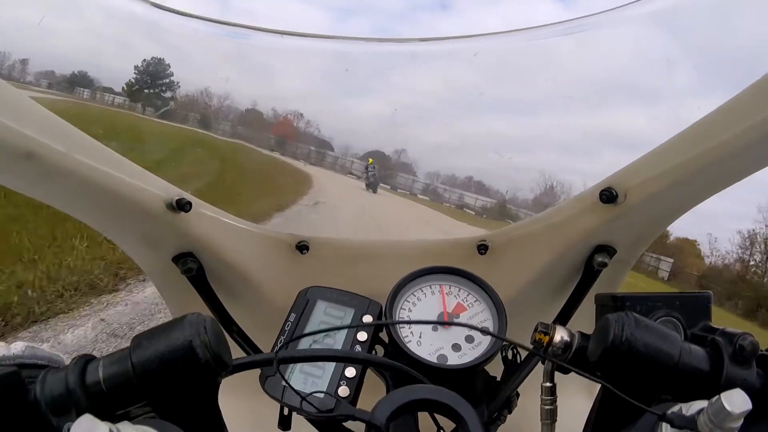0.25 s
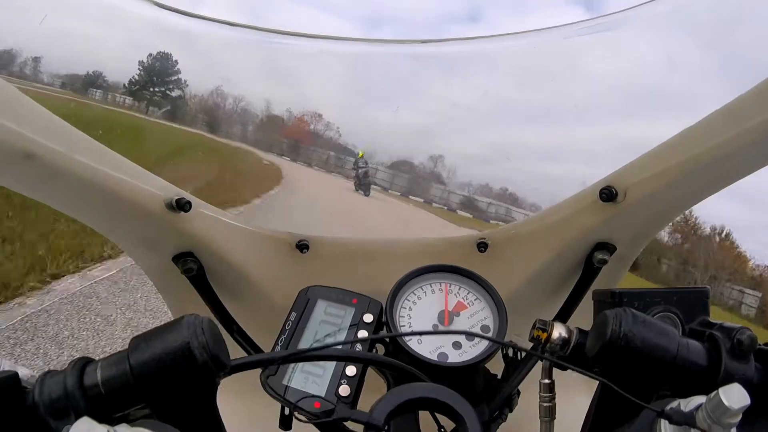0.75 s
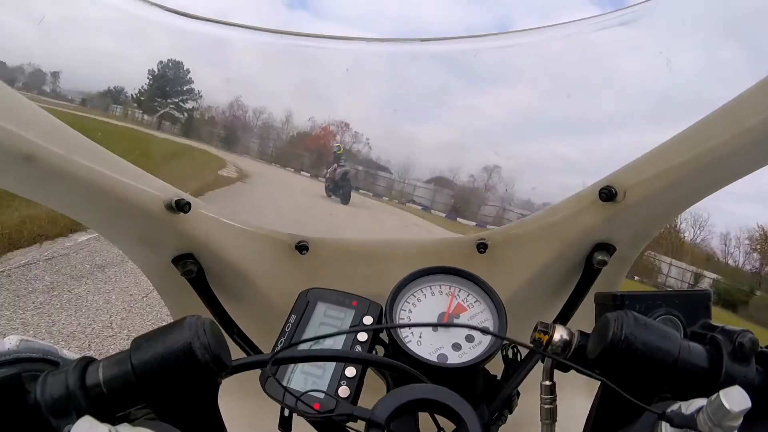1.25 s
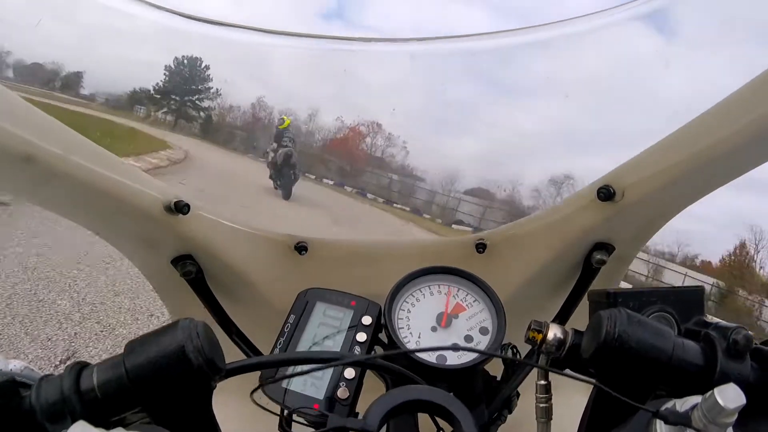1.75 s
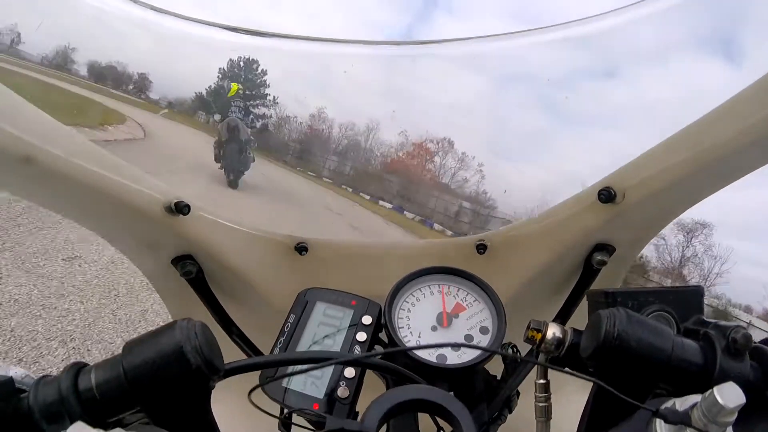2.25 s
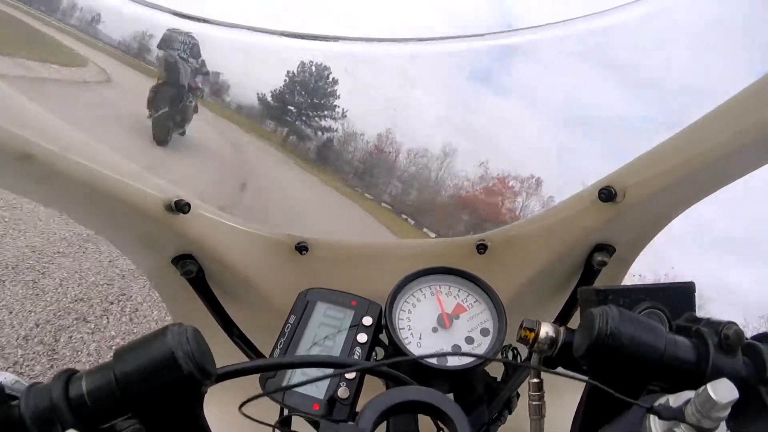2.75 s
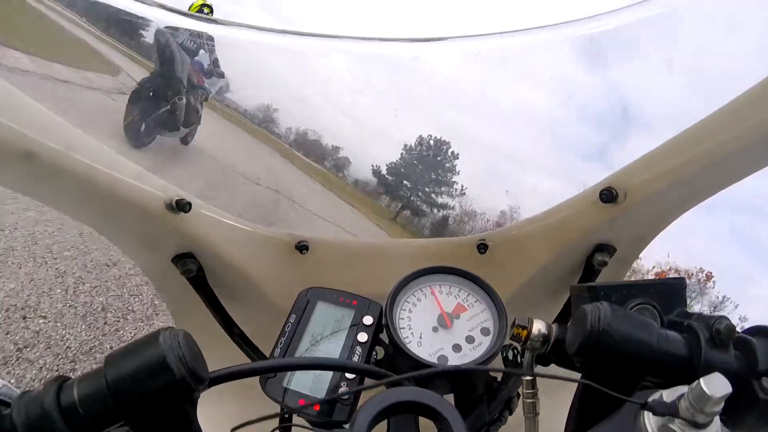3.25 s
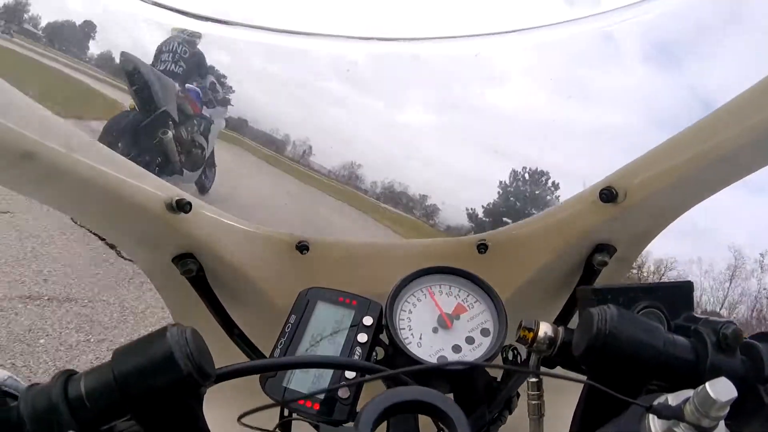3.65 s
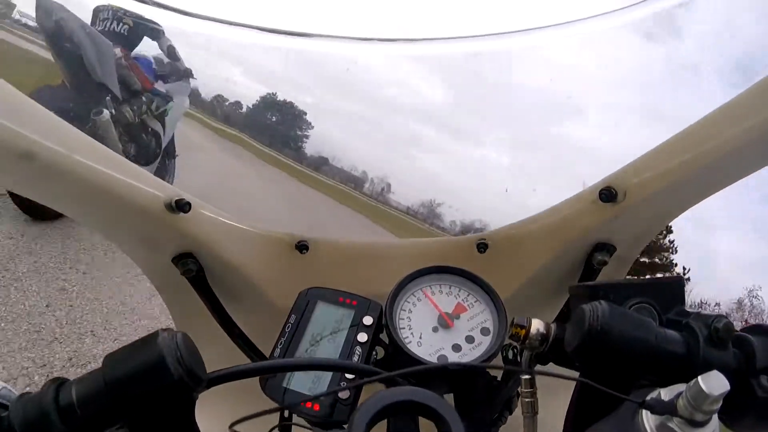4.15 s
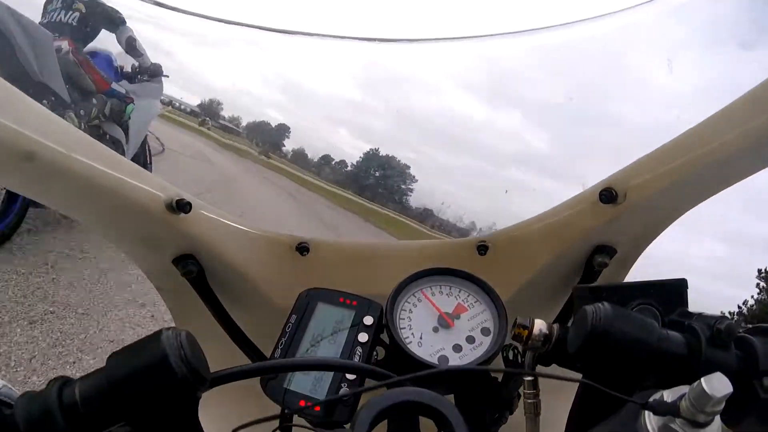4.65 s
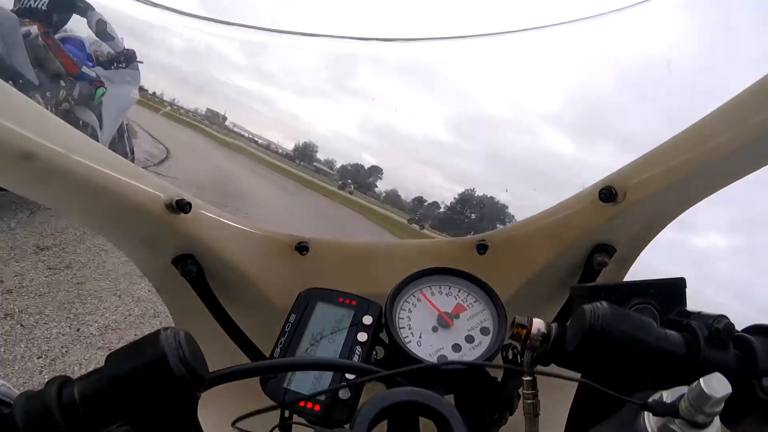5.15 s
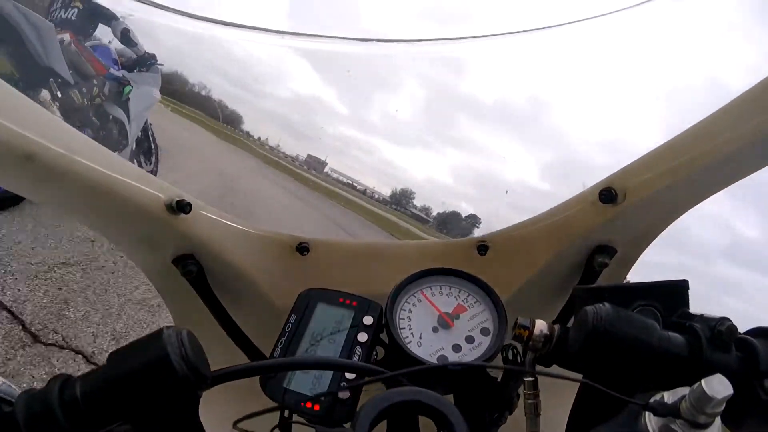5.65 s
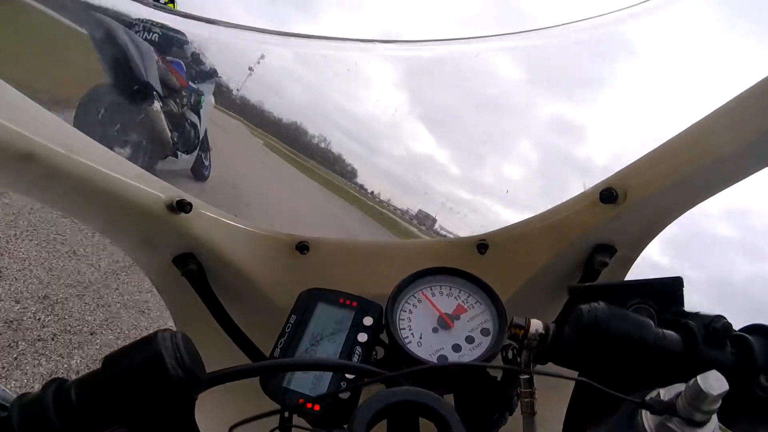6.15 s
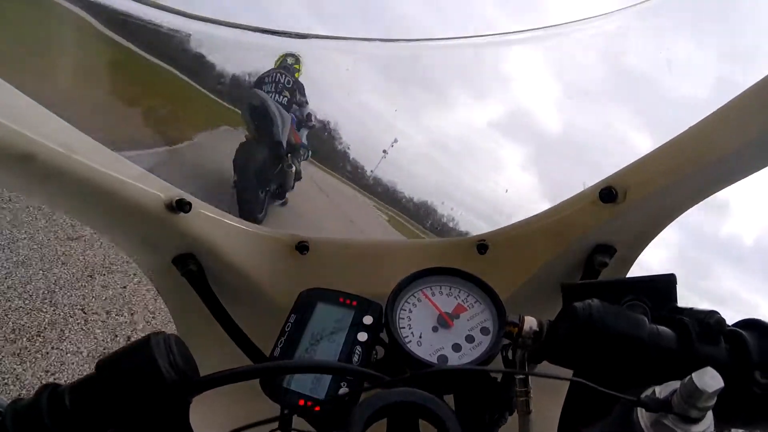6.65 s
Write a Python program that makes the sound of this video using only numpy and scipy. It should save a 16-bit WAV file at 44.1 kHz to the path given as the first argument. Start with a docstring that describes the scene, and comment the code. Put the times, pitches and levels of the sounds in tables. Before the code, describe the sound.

A small two-stroke racing motorcycle shifts down three times in quick succession, its exhaust rasping while wind thumps the microphone behind the fairing. The revs then sink for about three seconds and settle into a low, throbbing drone through a bend. Body panels rattle over bumps in the track, a soft hiss runs throughout, and a second motorcycle hums nearby, falling and then rising in pitch.

```python
"""On a race track, a small two-stroke racer brakes, shifts down three times and rounds a bend.
We listen from a camera bolted behind its fairing (the body panels). Wind buffets the housing, a
slower-firing engine runs alongside, and road bumps rattle the panels. The racer's crank shakes the
mount into a throbbing drone, while its firings rasp in the exhaust pipe over a soft hiss.
The camera samples at 16 kHz, so a faint mirror image of the sound sits above 8 kHz."""
import sys
import numpy as np
from scipy import signal
from scipy.fft import rfft, irfft, next_fast_len
from scipy.io import wavfile
from scipy.ndimage import uniform_filter1d

SR = 44100
rng = np.random.default_rng(int(sys.argv[2]) if len(sys.argv) > 2 else 0)


def master(y):
    """Save y as 16-bit WAV."""
    cut = np.clip(np.atleast_2d(y).T, -1, 1)
    pcm = np.round(cut * 32767)  # scale
    wavfile.write(sys.argv[1], SR, pcm.astype(np.int16))


N = 304731
TIME = np.arange(N) / SR


def undb(db):
    """Turn decibels into a gain to multiply by."""
    return 10 ** (np.asarray(db) / 20)


def curves(table):
    """Join a table's rows with straight lines over time: one curve for each column after the first."""
    seconds, *columns = np.transpose(table)
    return [np.interp(TIME, seconds, column) for column in columns]


def unit(x):
    """Scale a signal so that its average strength (rms) is 1."""
    return x / np.sqrt(np.mean(x ** 2))


def colour(x, points):
    """Turn frequencies up or down along a curve of (Hz, dB) points."""
    size = next_fast_len(N)
    hz, db = np.transpose(points)
    bin_hz = np.maximum(np.arange(size // 2 + 1) * SR / size, 1)
    gain = undb(np.interp(np.log(bin_hz), np.log(hz), db))
    return irfft(rfft(x, size) * gain, size)[:N]


def ring(x, hz, width):
    """A resonance: it passes sound near one frequency and weakens the rest."""
    return signal.lfilter(*signal.iirpeak(hz, hz / width, fs=SR), x)


def wander(rate):
    """A smooth random curve, about 1 in size, that heads for a new value `rate` times a second."""
    hold = int(SR / rate)
    steps = np.repeat(rng.standard_normal(N // hold + 1), hold)
    return unit(uniform_filter1d(uniform_filter1d(steps, hold), hold)[:N])


# Gusts that swell the rumble. Each row: time of the peak and spread in seconds, peak level in dB.
WIND_GUSTS = [(.11, 0.036, -37), (.33, 0.1, -25), (.59, 0.044, -19.5), (.76, 0.16, -20), (1.03, 0.046, -25),
              (1.15, 0.046, -24), (1.27, 0.025, -24), (1.4, 0.12, -28), (1.75, 0.053, -33),
              (1.981, 0.052, -23), (2.7, 0.096, -39.5), (3.06, 0.083, -30), (3.41, .03, -41),
              (4.72, 0.032, -39)]
# Gusts that thump the housing. Each row: time in seconds, strength in dB.
WIND_THUMPS = [(.305, -3.5), (.715, -2), (.76, -12.5), (1.14, -8.5), (1.74, -21), (1.98, -15)]


def wind(speed):
    """Air buffets the housing: a rumble that grows with speed and in gusts, plus short thumps."""
    steady = undb(-51.5 + 16 * np.log2(speed / 100) + 1.9 * wander(18))  # 16 dB per doubling of speed
    gusts = sum(undb(db) * np.exp(-((TIME - at) / spread) ** 2) for at, spread, db in WIND_GUSTS)
    thumps = sum(undb(db) * np.exp(-((TIME - at) / 0.0047) ** 2) for at, db in WIND_THUMPS)
    rumble_tone = [(10, -19.5), (25, 2.5), (60, 0), (110, -2), (250, -24.5), (600, -63)]
    rumble = unit(colour(rng.standard_normal(N), rumble_tone))
    return (steady + gusts) * rumble + colour(thumps, [(8, -29.5), (30, -1.5), (300, -2)])


# The engine alongside. Each row: time in seconds, cycles per second, level in dB.
NEIGHBOUR_RUN = [(0, 40.23, -29), (1.3, 39, -52), (1.7, 35.68, -26), (2.15, 32.8, -24.5),
                 (2.55, 30.17, -25), (2.9, 26.6, -25.5), (3.2, 25.98, -28.5), (3.5, 24.95, -30.5),
                 (3.9, 24.23, -26.5), (4.5, 25.4, -26.5), (4.9, 27.65, -29), (5.3, 30.2, -26.5),
                 (5.9, 34, -27.5), (6.3, 35.76, -28.5), (6.91, 36.7, -29)]
# Its tones. Each row: multiple of the cycle rate, relative level in dB.
NEIGHBOUR_TONES = [(1, -18.5), (2, -19.5), (3, -13), (4, -3), (5, -3.5), (6, -16), (7, -6), (8, -28),
                   (9, -21.5), (10, -33.5)]


def neighbour_engine():
    """A four-stroke alongside hums at whole multiples of its slow cycle."""
    hz, level_db = curves(NEIGHBOUR_RUN)
    phase = 2 * np.pi * np.cumsum(hz) / SR
    tones = sum(undb(db + 1.5 * wander(8)) * np.sin(round(k) * phase + k * k)
                for k, db in NEIGHBOUR_TONES)
    return np.sqrt(2) * undb(level_db) * tones


# How hard the rough road shakes the panels. Each row: time in seconds, strength in dB.
ROAD_SHAKE = [(0, -37), (.5, -32.5), (.7, -29.5), (.77, -46), (.85, -36.5), (1.0, -29), (1.33, -35),
              (1.46, -52), (1.8, -40.5), (2.9, -49), (3.0, -39.5), (3.6, -39), (3.75, -43), (4.0, -43.5),
              (4.5, -44), (4.66, -47), (6.38, -46.5), (6.45, -41.5), (6.91, -37.5)]
# Single bumps. Each row: start in seconds, strength in dB.
ROAD_BUMPS = [(.116, -25), (.16, -41), (.205, -36), (.245, -33), (.334, -29), (.42, -53), (.5, -35),
              (.57, -32), (.615, -28.5), (.67, -34), (.833, -24), (.935, -29), (.977, -37), (1.15, -43),
              (1.211, -33.5), (2.7, -26.5), (2.986, -29.5), (3.059, -32), (3.13, -26), (3.222, -42),
              (3.36, -35), (3.39, -33), (3.438, -34.5), (3.552, -39), (3.609, -32), (3.662, -42),
              (3.742, -40), (3.83, -41), (3.955, -35), (4.116, -42), (4.192, -36.5), (4.392, -40.5),
              (4.5, -37), (6.43, -37), (6.64, -36.5), (6.72, -34.5), (6.88, -47)]
# Where the panels ring. Each row: frequency in Hz, width in Hz, relative level in dB.
PANEL_RINGS = [(192.8, 17, 8.5), (305, 60, -1), (417.8, 46, 3), (480, 115, -6.5), (654.6, 45, -8.5),
               (850, 50, -5), (1078, 130, -9.5), (1333, 130, -13), (1820, 130, -19)]


def fairing_rattle(turns):
    """The road shakes the panels loose; they then knock once per crank turn and rustle in between."""
    rise_s, fade_s = .005, .015
    push = undb(curves(ROAD_SHAKE)[0] + 1.4 * wander(18))
    for start, db in ROAD_BUMPS:
        age = TIME - start
        push += undb(db) * np.clip(age / rise_s, 0, 1) * np.exp(-np.abs(age) / fade_s)
    knocks = np.append(np.diff(np.floor(turns)), 0) * undb(3.5 * wander(60))
    drive = push * (unit(knocks) + 1.39 * rng.standard_normal(N))
    rattle = 0
    for hz, width, db in PANEL_RINGS:
        ringing = ring(ring(drive, hz, width), hz, 3 * width)
        width_gain = np.sqrt(SR / width / 3)  # a narrow ring lets less through, so boost it
        rattle += undb(db + 2.5 * wander(14)) * width_gain * ringing
    return rattle


# The tone of the hiss. Each row: frequency in Hz, relative level in dB.
HISS_TONE = [(40, -14.5), (90, -7.5), (170, 6), (260, 2), (400, -15.5), (700, -17), (1200, -15.5),
             (1900, -18.5), (2750, -19), (2950, -24), (4100, -27.5), (5200, -41.5), (6100, -44),
             (7000, -35.5), (8000, -39.5)]
# How loud the hiss is. Each row: time in seconds, level in dB.
HISS_LEVEL = [(0, -30), (.5, -29), (.72, -25.5), (1.2, -29), (2.5, -29.5), (3.3, -29.5), (3.5, -32.5),
              (4.5, -31.5), (4.9, -30), (6.91, -31.5)]
# Where the housing rings. Each row: frequency in Hz, width in Hz, relative level in dB
# at 120 crank turns a second, dB added each time the revs double.
HOUSING_RINGS = [(4950, 500, -18, 6.5), (5680, 36, -25.5, 4.5), (6520, 94, -21, -10.5),
                 (5410, 470, -17, -12)]


def hiss(firing_hz, turns, roughness, dip_db):
    """Gas, chain and tyres hiss, pulsing faintly once a turn; the housing adds high, narrow rings."""
    noise = rng.standard_normal(N) * (1 + 0.023 * np.cos(2 * np.pi * turns))
    rush = unit(colour(noise, HISS_TONE)) * undb(1.5 * wander(12))
    flicker_db = (0.37 + 1.5 * roughness) * wander(11) - 0.74 * dip_db
    rings = 0
    for hz, width, db, db_per_doubling in HOUSING_RINGS:
        ring_db = db + db_per_doubling * np.log2(firing_hz / 120) + 0.67 * wander(4.9)
        rings += undb(ring_db + flicker_db) * unit(ring(noise, hz, width))
    return undb(curves(HISS_LEVEL)[0]) * (rush + undb(-6) * rings)


# Where the pipe and frame ring. Each row: frequency in Hz, width in Hz, boost in dB.
PIPE_RINGS = [(484.5, 93, 11), (615, 56, 5), (900, 120, -14), (1010, 76, 5), (1250, 140, -5),
              (1456, 79, -3), (1736, 380, -7.5), (2180, 210, -6), (2452, 150, -4.5), (2730, 100, -1),
              (3240, 500, -13), (4274, 71, -15.5), (5010, 410, -18.5), (6340, 62, -10.5)]
# How the rasp changes. Each row: time in seconds, level in dB, growl boost in dB, treble boost in dB.
RASP_LEVELS = [(0, -45, 1, -6.5), (.6, -42, 2, -5.5), (.7, -31, -7, -9), (.82, -35, -10, -14),
               (1.0, -41.5, 2, -16), (1.2, -36, 1.5, -8.5), (1.75, -39.5, 1, -11.5), (2.2, -44.5, 3.5, 1),
               (2.3, -41, 10, -4.5), (2.45, -47.5, 16, 1), (2.7, -49, 8, 5.5), (3.2, -44.5, 7.5, 1),
               (3.45, -42.5, -2, -11), (3.65, -50, -0.5, -6.5), (4.5, -47, 3, 2), (4.7, -45, -6, 3),
               (5.2, -44, -8, 4), (5.9, -47, 3, 3), (6.91, -45.5, -4.5, 4.5)]
# The tone of one firing. Each row: multiple of the firing rate, boost in dB.
FIRING_TONE = [(5, -2.5), (6, -5.5), (7, 2), (8, 2.5), (9, 0.5), (10, -1), (11, 2.5), (12, -2), (13, 2),
               (14, 0.5), (16, 4), (20, -1)]


def pipe_rasp(firing_hz, turns, roughness, dip_db):
    """Firings rasp in the pipe: each multiple of their rate swells as it crosses a resonance."""
    treble_hz, growl_hz, growl_width_hz = 1950, 1350, 170
    rasp, step = 0, 64  # loudness is worked out once every 64 samples
    level_db, growl_db, treble_db = (curve[::step] for curve in curves(RASP_LEVELS))
    for multiple in range(5, 66):
        hz = multiple * firing_hz[::step]
        pipe_power = sum(undb(2 * db) / (1 + (2 * (hz - centre) / width) ** 2) ** 2
                         for centre, width, db in PIPE_RINGS)
        boost_db = np.interp(multiple, *np.transpose(FIRING_TONE))
        boost_db += treble_db / (1 + (treble_hz / hz) ** 8)
        boost_db += growl_db * np.exp(-((hz - growl_hz) / growl_width_hz) ** 2)
        waver_db = (1.2 * wander(3) + 6 * roughness * wander(30))[::step]
        gain = np.sqrt(pipe_power) * undb(level_db + boost_db + waver_db) * (hz < SAMPLING_HZ / 2)
        lag = .33 * rng.random()  # the tones stay nearly in step, so each firing is heard as a pulse
        rasp += np.interp(TIME, TIME[::step], gain) * np.sin(2 * np.pi * (multiple * turns + lag))
    return np.sqrt(2) * undb(-.4 * dip_db) * rasp


# How well the mount passes shaking. Each row: frequency in Hz, gain in dB.
MOUNT_RESPONSE = [(100, -27.5), (120, -24), (140, -24.5), (155, -16.5), (165, -12.5), (176, -10.5),
                  (200, -7.5), (215, -9), (240, -14.5), (255, -12), (270, -22.5), (290, -23), (312, -28),
                  (332, -37), (352, -21), (380, -31.5), (410, -25), (445, -27), (480, -39), (545, -30),
                  (600, -44), (710, -37)]
# The crank's tones. Each row: multiple of the turning rate, relative level in dB,
# waver in dB per unit of roughness, how strongly it follows the throb (1 means in full).
CRANK_TONES = [(1, 0.5, 3.5, 1.0), (2, 0, 3, 0.81), (3, -10.5, 5.5, 0.86), (4, 0.5, 5.5, 1.37)]
# The lowest tone swells and sinks on its own. Each row: time in seconds, boost in dB.
LOWEST_TONE_SWELL = [(0, 0.5), (.75, -3), (.87, 7.5), (.97, 6.5), (1.05, -6.5), (1.2, 2.5), (1.4, 0.5),
                     (1.7, -7), (1.97, 4.5), (2.05, -20), (2.3, -8), (2.9, -13), (3.0, 3.5), (4.4, 2),
                     (4.6, -4), (5.7, 3), (6.15, -7.5), (6.5, 1), (6.91, -1)]


def crank_drone(firing_hz, turns, roughness, dip_db):
    """The spinning crank shakes the mount, which passes on four nearly pure tones."""
    swell_db, = curves(LOWEST_TONE_SWELL)
    drone = 0
    for multiple, db, waver_db, throb_share in CRANK_TONES:
        k = round(multiple)
        mount_db = np.interp(k * firing_hz, *np.transpose(MOUNT_RESPONSE))
        change_db = swell_db * (k == 1) - throb_share * dip_db + roughness * waver_db * wander(35)
        drone += undb(db + mount_db + change_db) * np.sin(2 * np.pi * k * turns + k)
    return np.sqrt(2) * drone


# Dips in the engine's loudness; a short spread gives one dip, a long one gives several.
# Each row: time of the deepest point in seconds, spread in seconds, depth in dB.
THROB_DIPS = [(.741, 0.021, 6.5), (0.915, 0.018, 5.5), (.968, 0.016, 8.5), (1.037, 0.022, 6.5),
              (1.093, .015, 8), (1.268, 0.031, 6.5), (1.517, .015, 11.5), (1.687, 0.031, 4.5),
              (1.78, 0.017, 5), (2.213, 0.16, 9.5), (2.712, 0.021, 7.5), (2.898, 0.023, 7.5),
              (2.961, .015, 6.5), (3.028, 0.022, 6.5), (3.236, 0.014, 8), (3.311, 0.053, 7.5),
              (3.525, 0.12, 8.5), (3.93, 0.048, 6), (4.264, 0.16, 7), (4.55, .03, 2.5), (4.77, .25, 4),
              (5.154, 0.041, 3), (5.715, .24, 7), (6.33, .2, 0.5), (6.633, 0.039, 3), (6.782, .015, 3.5),
              (6.859, 0.013, 3.5)]


def throb(t):
    """The drone throbs: this gives the depth of the dips in dB at the times t."""
    throb_hz = 10.53
    return sum(db * np.exp(-((t - at) / spread) ** 4) * np.cos(np.pi * throb_hz * (t - at)) ** 2
               for at, spread, db in THROB_DIPS)


# Downshifts. Each row: start in seconds, clutch slip in seconds, ratio of the new gear to the old.
DOWNSHIFTS = [(0.269, 0.087, 1.18), (.575, .1, 1.18), (.94, .18, 1.27)]


def revs(speed, roughness):
    """The firing rate and crank turns so far: each downshift lifts the revs as the clutch bites."""
    early_dip_db = np.minimum(throb(TIME + .02), 4)
    firing_hz = speed * (1 + .0015 * early_dip_db)  # the revs rise a little just before each dip
    for start, slip, ratio in DOWNSHIFTS:
        old_gear_share = np.cos(np.pi / 2 * np.clip((TIME - start) / slip, 0, 1)) ** 2
        firing_hz /= ratio ** old_gear_share
    waver = 1 + .004 * roughness * wander(30)
    return firing_hz, np.cumsum(firing_hz * waver) / SR


# Road speed. Each row: time in seconds, the firing rate in Hz that this speed gives in the final gear.
ROAD_SPEED = [(0, 253.6), (.57, 210.5), (.76, 200.3), (.94, 187.7), (1.2, 174.7), (1.6, 158.8),
              (2.02, 143.4), (2.3, 135.5), (2.62, 124.2), (2.9, 122.1), (3.22, 117.5), (3.5, 110.7),
              (3.88, 103.4), (4.29, 99.97), (4.53, 105.4), (4.63, 98.7), (5.16, 99.5), (5.4, 101.1),
              (6.01, 102.7), (6.36, 103.8), (6.77, 103.9), (6.91, 103.6)]


def scene():
    """The racer's engine, its neighbour, the panels and the wind all reach one microphone."""
    speed, = curves(ROAD_SPEED)
    road_db, = curves(ROAD_SHAKE)
    smooth_road_db = -49  # above this, the engine runs rougher
    roughness = np.clip((road_db - smooth_road_db) * 0.07, 0, .55)
    firing_hz, turns = revs(speed, roughness)
    dip_db = throb(TIME)
    engine = sum(part(firing_hz, turns, roughness, dip_db) for part in (crank_drone, hiss, pipe_rasp))
    return (engine + neighbour_engine() + fairing_rattle(turns) + wind(speed))[None]


# Strength of the mirror image. Each row: distance below the sampling rate in Hz, gain in dB.
MIRROR_TONE = [(200, -48), (270, -44.5), (420, -40), (1200, -25), (2700, -21), (5000, -15.5), (6500, -12),
               (8000, -0.5)]
SAMPLING_HZ, TOP_HZ = 16000, 15770


def record(dry):
    """The camera rounds off peaks, cuts at half its sampling rate and leaves a mirror image above."""
    ceiling, gain_db = 1.14, 1.0
    rounded = np.tanh(dry[0] / ceiling) * ceiling * undb(gain_db)
    keep_low = signal.ellip(8, .2, 70, SAMPLING_HZ / 2, fs=SR, output="sos")
    keep_high = signal.ellip(8, .2, 70, SAMPLING_HZ / 2, "high", fs=SR, output="sos")
    cut_top = signal.ellip(14, .2, 80, TOP_HZ, fs=SR, output="sos")
    sound = signal.sosfilt(keep_low, rounded)
    flipped = 2 * colour(sound, MIRROR_TONE) * np.cos(2 * np.pi * SAMPLING_HZ * TIME)
    mirror = signal.sosfilt(keep_high, flipped)
    return signal.sosfilt(cut_top, sound + mirror)[None]


dry = scene()
out = record(dry)
master(out)
```